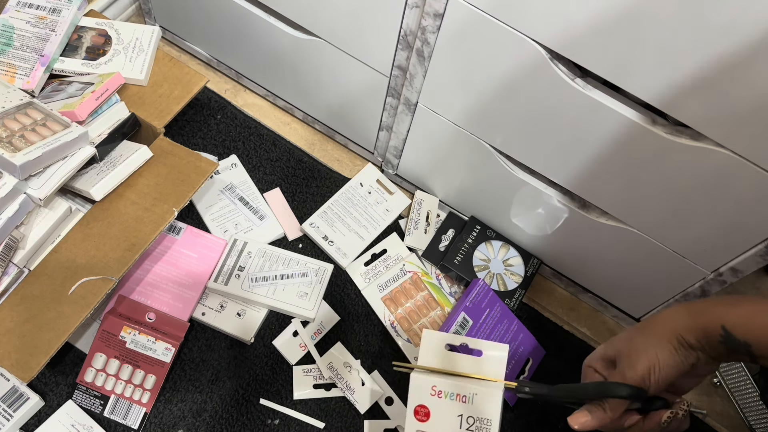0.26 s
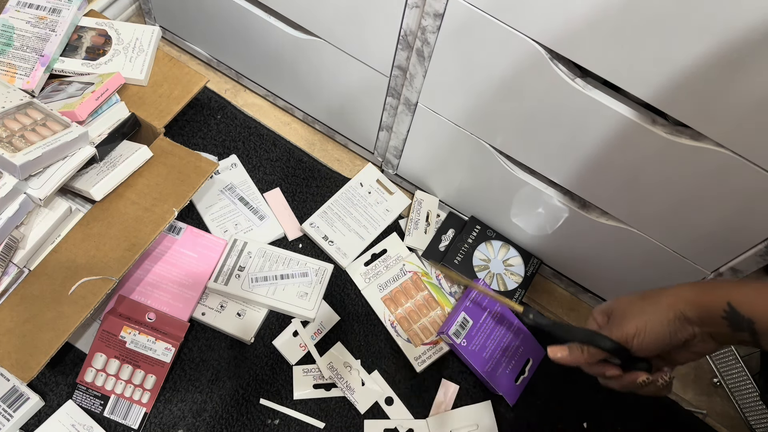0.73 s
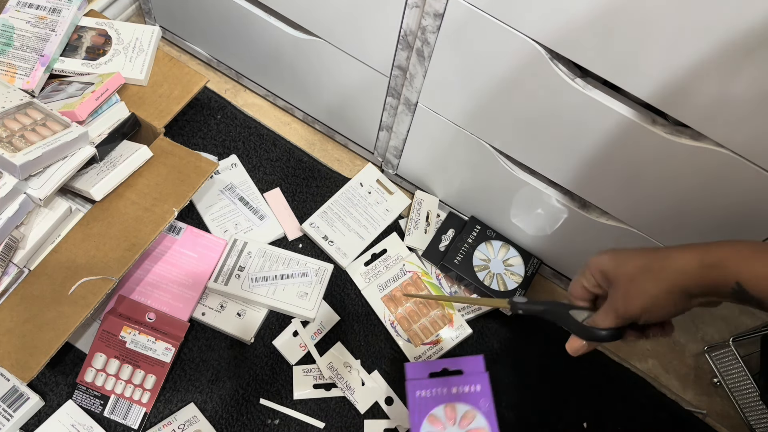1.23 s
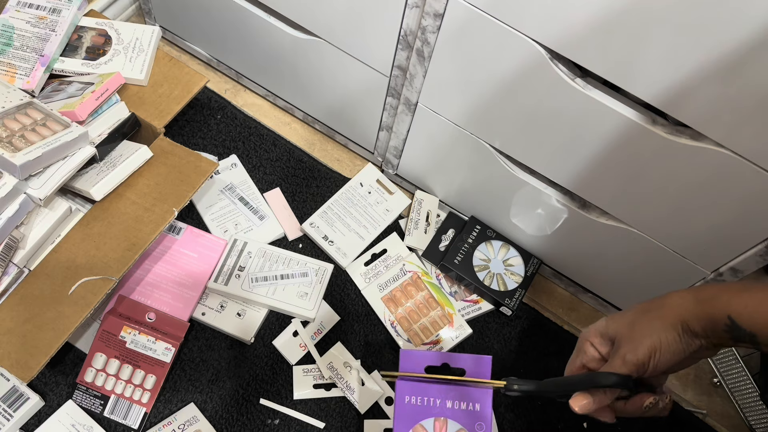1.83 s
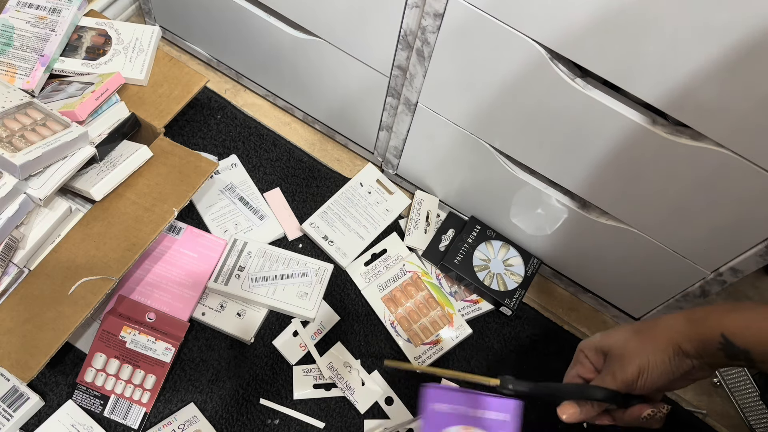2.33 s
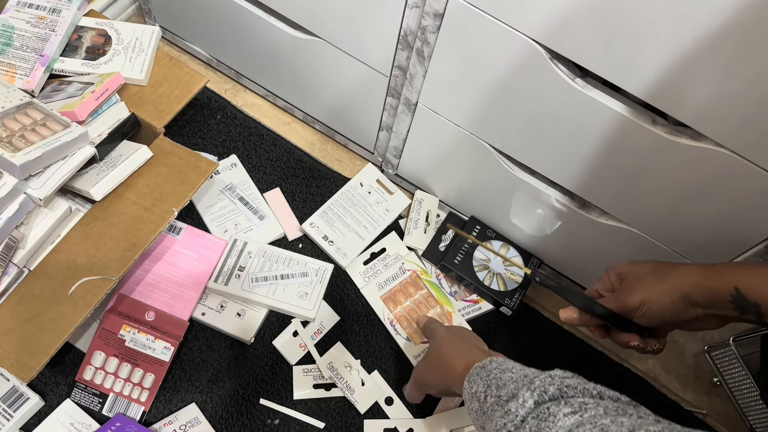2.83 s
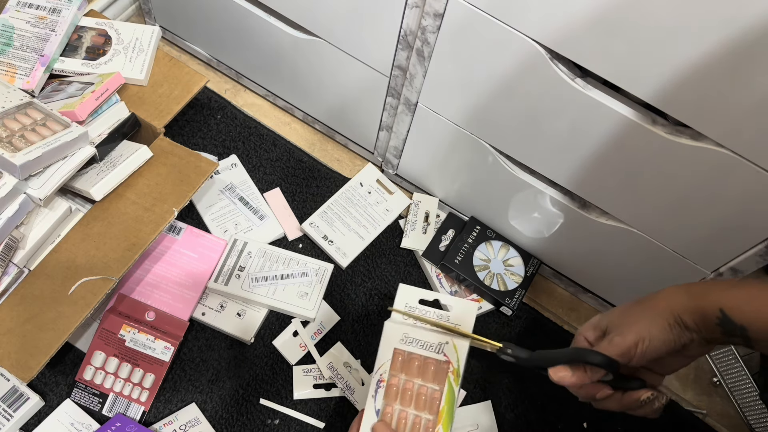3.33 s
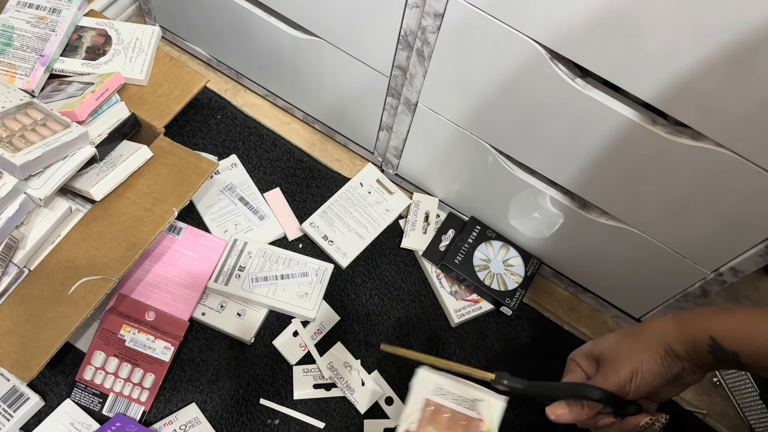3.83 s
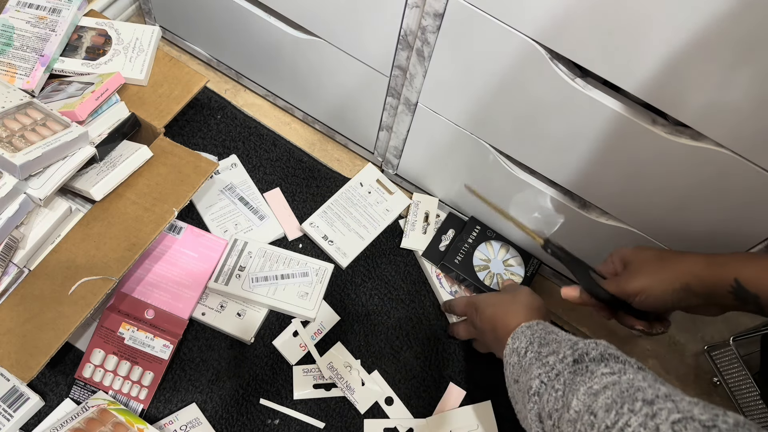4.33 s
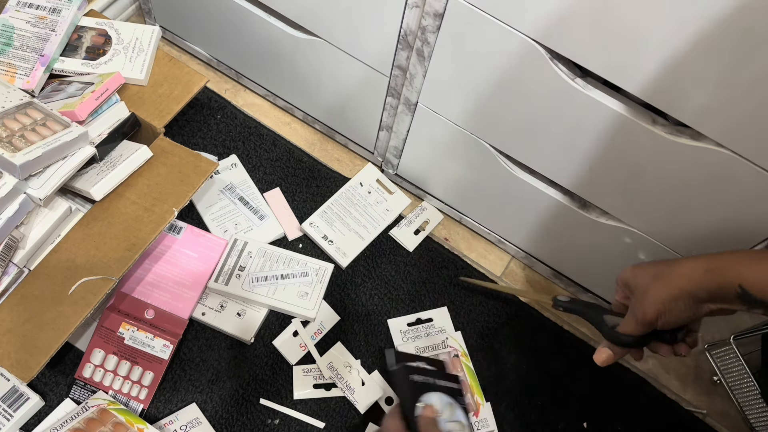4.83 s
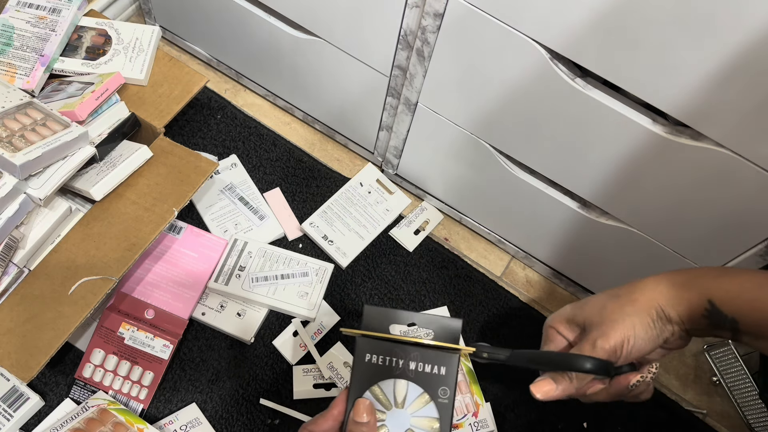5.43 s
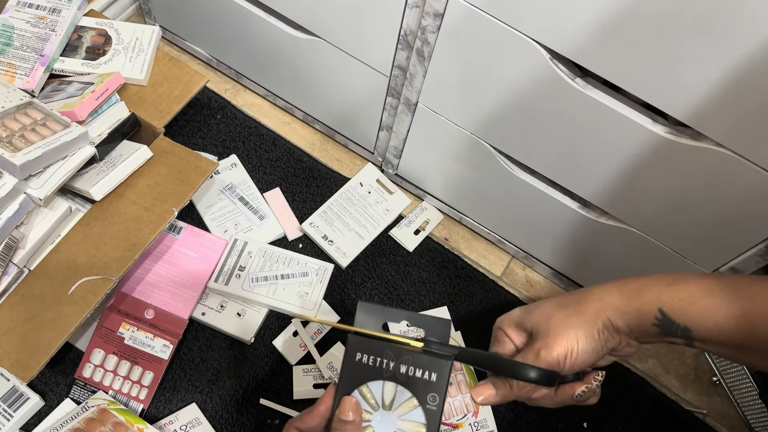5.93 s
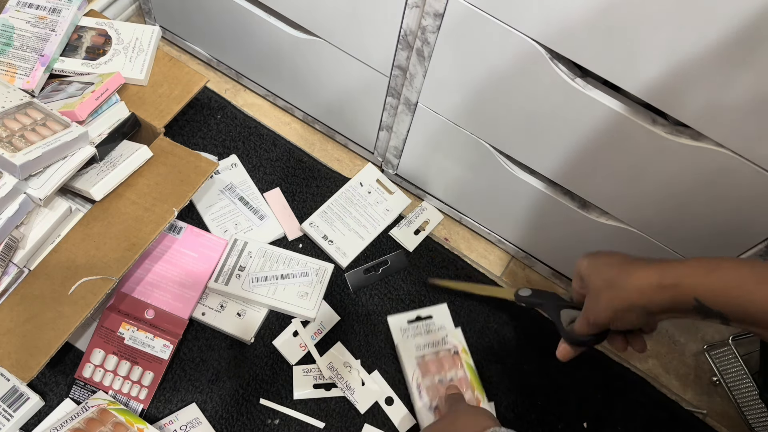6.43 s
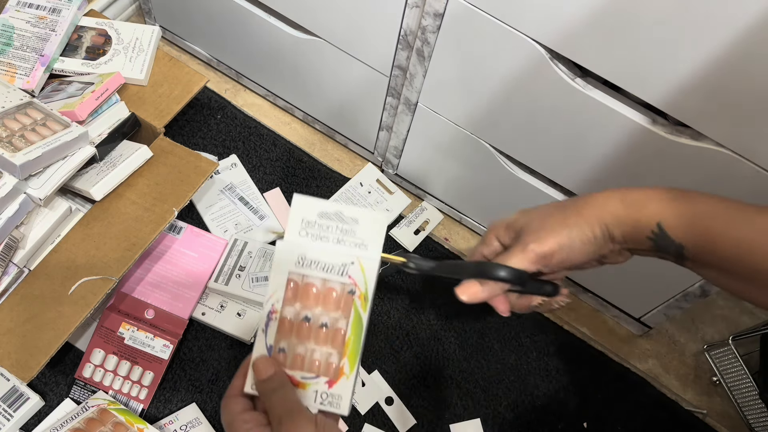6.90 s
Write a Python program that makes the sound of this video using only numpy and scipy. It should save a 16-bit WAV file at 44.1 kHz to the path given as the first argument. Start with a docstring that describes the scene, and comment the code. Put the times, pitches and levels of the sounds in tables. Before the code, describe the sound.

In a small room with a soft floor and a faint hum, thin card packs are picked up, cut with scissors and dropped, one after another. The snips are dry and crackly, close to the microphone, mixed with rustling, short scrapes and taps on hollow boxes. A few sharper slaps and dull bumps stand out along the way, and the handling ends in lighter rubbing and ticks.

```python
"""A small soft-floored room with a faint hum. Close by, scissors snip through thin card packs that are
picked up, turned and dropped on a pile. Every snip, tap and slap is a burst of tiny cracks that rings
the card and its hollow box. In between, fingers and card edges rub and scrape, and packs and hands
bump the floor."""
import sys
import numpy as np
from scipy import signal
from scipy.fft import rfft, irfft
from scipy.io import wavfile
from scipy.ndimage import uniform_filter1d

SR = 44100
rng = np.random.default_rng(int(sys.argv[2]) if len(sys.argv) > 2 else 0)


def log_audio(samples):
    """Write samples as a 16-bit WAV file to the path given in sys.argv[1]."""
    # one column per channel
    frames = np.atleast_2d(samples).T
    # limit to full scale, then quantise
    limited = np.clip(frames, -1, 1)
    pcm = np.round(limited * 32767).astype(np.int16)
    wavfile.write(sys.argv[1], SR, pcm)


N = 315756


def gain_of(db):
    return 10 ** (np.asarray(db) / 20)


def unit_rms(x):
    return x / np.sqrt(np.mean(x ** 2) + 1e-20)


def curve_at(points, hz):
    """Read a curve along a log-frequency axis."""
    point_hz, value = np.transpose(points)
    return np.interp(np.log(hz + 1), np.log(point_hz + 1), value)


def add(mix, start_s, sound):
    part = mix[..., max(round(start_s * SR), 0):][..., :sound.shape[-1]]
    part += sound[..., :part.shape[-1]]


def equalise(x, curve):
    """Minimum-phase EQ of unit energy: colour with no ringing ahead of the attack."""
    hz = abs(np.fft.fftfreq(4096, 1 / SR))
    log_gain = curve_at(curve, hz) * np.log(10) / 20
    taps = np.fft.ifft(np.exp(np.conj(signal.hilbert(log_gain)))).real[:2048]
    return signal.oaconvolve(x, taps[None] / np.linalg.norm(taps), axes=1)[:, :N]


def ring(x, hz, width_hz):
    """Band-pass resonance that keeps the power of white noise."""
    radius = np.exp(-np.pi * np.clip(width_hz, 20, 4000) / SR)
    feedback = [1, -2 * radius * np.cos(2 * np.pi * hz / SR), radius ** 2]
    return signal.lfilter(np.sqrt((1 - radius ** 2) / 2) * np.array([1, 0, -1]), feedback, x)


# Colour of the room tone. Each row: frequency in Hz, relative level in dB.
AIR_EQ = [(24, -44.5), (40, -12.5), (64, -2.5), (158, -3), (198, -10.5), (327, -9.5), (380, -26.5),
          (526, -12), (728, -32), (890, -34), (1330, -21.5), (12600, -26), (15800, -26.5)]
# Width of the room tone. Each row: frequency in Hz, left-right likeness from 0 (wide) to 1 (mono).
AIR_LIKENESS = [(100, 1), (600, 0.25), (2000, 0.13), (8000, .1)]
AIR_DB, HUM_DB, HUM_HZ = -69, -79.5, 125


def room_tone():
    """Room air and microphone hiss, with a wavering mains hum."""
    hz = np.fft.rfftfreq(N, 1 / SR)
    left, other = rfft(rng.standard_normal((2, N)))
    likeness = np.clip(curve_at(AIR_LIKENESS, hz), 0, 1)
    right = likeness * left + np.sqrt(1 - likeness ** 2) * other
    hiss = irfft(np.array([left, right]) * gain_of(curve_at(AIR_EQ, hz)), N)
    hum = ring(rng.standard_normal(N), HUM_HZ, width_hz=25)
    return gain_of(AIR_DB) * unit_rms(hiss) + gain_of(HUM_DB) * hum


# The room's short decay. Each row: frequency in Hz, seconds to fall 60 dB.
ROOM_T60 = [(200, 0.061), (1000, 0.13), (4000, 0.088), (15000, 0.1)]
# Bounce off the pile and drawers. Each row: frequency in Hz, send level in dB.
REFLECTION_EQ = [(200, -63), (1000, -13), (4000, -7.5), (15000, -11.5)]


def reflections(x):
    """Sparse echoes of random sign, different left and right, each band dying at its own speed."""
    taps = np.zeros((2, SR // 3))
    predelay, gap = 40, 20  # samples
    slots = np.arange(predelay, SR // 3 - gap, gap)
    arrivals = slots + rng.integers(0, gap, (2, len(slots)))
    np.put_along_axis(taps, arrivals, rng.choice([-1., 1.], arrivals.shape), 1)
    hz, t, bands = signal.stft(taps, SR, nperseg=128)
    t60 = curve_at(ROOM_T60, hz)[:, None]
    decay = gain_of(curve_at(REFLECTION_EQ, hz)[:, None] - 60 * t / t60)
    unit_energy = np.sqrt(gap * 6 * np.log(10) / (t60 * SR))
    tail = signal.istft(bands * decay * unit_energy, SR, nperseg=128)[1]
    tail[:, :predelay] = 0
    return signal.oaconvolve(x, tail, axes=1)[:, :N]


# Packs and hands bumping the soft floor. Each row: start in seconds, level in dB, pack pitch in Hz.
THUDS = [(0.255, -49, 219), (.341, -53, 245), (0.476, -35.5, 174), (.699, -50, 315), (1.53, -46, 291),
         (1.887, -54, 300), (2.251, -41.5, 124), (2.56, -45, 322), (3.118, -49.5, 135), (3.269, -51, 146),
         (3.77, -38, 184), (4.063, -36, 325), (4.512, -39.5, 353), (5.208, -51, 212), (5.535, -52, 350),
         (5.62, -47, 350), (5.965, -44.5, 129), (6.291, -34.5, 261)]
PACK_T60_S, FLOOR_T60_S, FLOOR_HZ, FLOOR_DB = 0.071, .16, 110, -9


def thuds():
    """A soft push rings the pack for a few cycles, and the floor answers below it."""
    out, t = np.zeros(N), np.arange(SR // 4) / SR
    attack = 1 - np.exp(-t / 0.00043)
    for (start, db, hz), (pack_phase, floor_phase) in zip(THUDS, rng.random((len(THUDS), 2))):
        pack = gain_of(-60 * t / PACK_T60_S) * np.sin(2 * np.pi * (hz * t + pack_phase))
        floor = gain_of(-60 * t / FLOOR_T60_S) * np.sin(2 * np.pi * (FLOOR_HZ * t + floor_phase))
        add(out, start, gain_of(db) * attack * (pack + gain_of(FLOOR_DB) * floor))
    return out


def crackle(count, per_s, spread_db, clump_db, clump_s):
    """Fibres break as tiny clicks of uneven size that come in clumps."""
    clicks = rng.random(count) < per_s / SR
    size = np.minimum(rng.exponential(1, count), 4)
    kick, drift = rng.standard_normal((2, count))
    window = int(clump_s * SR) + 1
    clumps = unit_rms(uniform_filter1d(uniform_filter1d(drift, window), window))
    return unit_rms(clicks * kick * gain_of(spread_db * size + clump_db * clumps))


# Stereo width, as the gain of the side signal. In order: card, box, cut edges, treble.
LAYER_WIDTH = np.array([.4, .2, .5, .45])


def widen(mid, side):
    """Cracks lie all along the card, so left and right differ. Returns (layer, channel, sample)."""
    width = LAYER_WIDTH[:, None, None]
    return np.sqrt(1 - width ** 2) * mid[..., None, :] + width * side[..., None, :] * [[1], [-1]]


def friction(count, **grain):
    """The tiny slips of sliding card, as stereo crackle for each of the four layers."""
    slips = crackle(count, **grain)
    return widen(slips, slips * rng.choice([-1, 1], count))


# The four tone layers of a pack. Each row: frequency in Hz, relative level in dB.
CARD_EQ = [(600, -31.5), (1200, -9), (1800, 4), (2600, 8.5), (3300, -6), (4500, -20)]
BOX_EQ = [(60, -39), (120, -11.5), (250, -7), (500, -4.5), (800, 3.5), (1100, -2.5), (1800, -33.5)]
EDGE_EQ = [(2200, -31), (3200, 2), (4000, 4), (5000, 2.5), (6000, -1.5), (8000, -31)]
TREBLE_EQ = [(3000, -42), (5000, -6.5), (7000, -2), (10000, -4), (12500, -7), (15000, -1.5)]


def pack_body(layers, trims_db):
    """The stiff card, the hollow box, the cut edges and the fine treble each have a colour."""
    curves = CARD_EQ, BOX_EQ, EDGE_EQ, TREBLE_EQ
    return sum(gain_of(db) * equalise(x, curve) for x, db, curve in zip(layers, trims_db, curves))


# Fader moves for the rubbing. Each row: time in seconds, then card, low and treble drive in dB.
RUB_FADERS = [(0.0, -72, -75.5, -62.5), (0.66, -56.5, -77, -53.5), (0.94, -70, -66, -62),
              (1.15, -78, -92, -65), (1.45, -62.5, -67, -57), (1.75, -56, -73.5, -55),
              (2.45, -60, -80, -57.5), (2.65, -73.5, -79, -68), (3.09, -62.5, -76.5, -55),
              (3.39, -94, -65, -71), (3.63, -63, -59.5, -58), (3.95, -58, -82, -50), (4.11, -81, -81, -74),
              (4.35, -81.5, -81, -71), (4.46, -76, -79, -71), (4.63, -55.5, -65, -52),
              (4.81, -63.5, -80, -52), (5.24, -52.5, -64.5, -58), (5.36, -60, -74, -51),
              (5.64, -64, -77, -63), (6.04, -62, -76.5, -55), (6.4, -61.5, -74.5, -58.5),
              (6.96, -69, -74.5, -61), (7.16, -83, -82, -75)]
# The hands rest. Each row: start in seconds, end in seconds.
# Overlapping rests dip further; a row that ends before it starts does nothing.
RESTS = [(.285, 0.32), (.66, 0.79), (.885, .925), (1.02, 1), (1.37, 1.39), (1.7, 1.62), (2.038, 2.13),
         (2.78, 2.9), (3.205, 3.6), (3.29, 3.6), (3.6, 4.1), (3.8, 3.6), (4.855, 5.32), (5.27, 4.6),
         (5.47, 4.95), (5.67, 5.93), (5.89, 5.86)]
# Palms brushing pile and floor. Each row: frequency in Hz, relative level in dB.
PALM_EQ = [(150, -18), (300, -3.5), (500, -2), (700, 3.5), (1000, -20.5), (1500, -36)]
REST_DB, REST_FADE_S = -10, 0.013
PALM_DB, HELD_BOX_DB = 2.5, -7  # trims on the low fader; the hand damps the box


def rubbing():
    """Fingers and card rub in dense slips that follow the hands and duck when they rest."""
    t = np.arange(N) / SR
    rests = sum((t > start) & (t < end) for start, end in RESTS).astype(float)
    duck_db = REST_DB * uniform_filter1d(rests, int(REST_FADE_S * SR))
    times, *faders = np.transpose(RUB_FADERS)
    card_db, low_db, treble_db = (np.interp(t, times, fader) + duck_db for fader in faders)
    edge_db = (card_db + treble_db) / 2 - 1.5
    slips = friction(N, per_s=20000, spread_db=1.0, clump_db=2.5, clump_s=0.006)
    layers = gain_of([card_db, low_db, edge_db, treble_db])[:, None] * slips
    palms = gain_of(PALM_DB) * equalise(layers[1], PALM_EQ)
    return pack_body(layers, trims_db=[0, HELD_BOX_DB, 0, 0]) + palms


# Strokes that sing in one band. Each row: start and end in seconds, start and end pitch in Hz,
# bandwidth in Hz, start and end level in dB.
SCRAPES = [(0.407, 0.442, 3630, 3320, 500, -45, -38), (0.47, 0.503, 1500, 3200, 600, -30, -41),
           (1.045, 1.211, 1980, 2320, 400, -51.5, -44), (1.117, 1.217, 7950, 7350, 1210, -38.5, -42.5),
           (1.417, 1.435, 6000, 6000, 7240, -52, -54), (1.739, 1.765, 4000, 4000, 7000, -41, -47),
           (2.28, 2.413, 2380, 1920, 480, -52, -46.5), (3.461, 3.501, 4300, 3650, 7200, -41, -54.5),
           (3.688, 3.7, 5000, 5000, 7000, -50, -60), (4.448, 4.564, 1550, 1470, 795, -43, -38),
           (4.578, 4.846, 1390, 1240, 780, -45, -59.5), (4.897, 4.92, 6850, 7000, 12200, -41, -57),
           (6.276, 6.328, 2200, 2220, 350, -37, -36), (6.323, 6.46, 2170, 1780, 346, -30.5, -60),
           (6.667, 6.685, 3020, 3530, 4840, -47, -45)]


def scrapes():
    """Slips excite a resonance that slides as the free length of card changes."""
    out = np.zeros((2, N))
    card_slips = friction(N, per_s=13000, spread_db=2.5, clump_db=6.5, clump_s=0.0028)[0]
    for start, end, start_hz, end_hz, width_hz, start_db, end_db in SCRAPES:
        slips = card_slips[:, round(start * SR):round(end * SR)]
        count = slips.shape[1]
        sweep = np.exp(2j * np.pi * np.cumsum(np.linspace(start_hz, end_hz, count)) / SR)
        pole = [1, -np.exp(-np.pi * width_hz / SR)]
        # Shift down, low-pass, shift back: a band-pass that rides the sweep.
        band = (sweep * signal.lfilter([1], np.convolve(pole, pole), slips / sweep)).real
        envelope = gain_of(np.linspace(start_db, end_db, count)) * signal.windows.tukey(count, .25)
        add(out, start, unit_rms(band) * envelope)
    return out


# Snips, taps and slaps. Each row: start in seconds, card drive in dB, card ring in Hz, box ring in Hz,
# box and treble drive in dB over the card, attack in seconds, seconds to fall 60 dB.
HITS = [(0.0266, -36, 2770, 407, -16, -7, 0.003, 0.26), (0.055, -34.5, 2320, 635, -3, -2.5, 0.0086, 0.017),
        (.082, -47, 3050, 700, -7, 0, .002, 0.013), (0.153, -47, 2700, 900, -18, 3, 0.0046, 0.24),
        (0.2125, -38, 2740, 1130, -14, -4.5, 0.0032, 0.15),
        (0.2312, -26, 2650, 1020, -24, -9.5, 0.0072, 0.016), (.2456, -33.5, 1970, 300, -15, 0, .002, 0.027),
        (0.2583, -26.5, 2720, 1030, -13.5, -6.5, 0.0018, .035),
        (0.3319, -36.5, 2900, 1040, -27, -7, 0.0025, 0.13),
        (0.3393, -35.5, 2540, 960, -4, 1.5, 0.0047, 0.035), (0.396, -34, 3440, 440, -27, -7, 0.01, .026),
        (.409, -30, 2540, 970, -28, -2.5, 0.008, .011), (0.4218, -25, 3470, 1000, -14, -8, 0.0019, 0.013),
        (0.4287, -29.5, 3540, 990, -12, -4, .003, 0.018), (0.439, -25, 1270, 1000, -26, -20, .002, 0.023),
        (0.46, -32, 2420, 825, -5, -5, .002, .055), (.472, -19, 2830, 973, -10, 3, 0.0041, .029),
        (.491, -25, 2750, 705, -8.5, -8, 0.0047, 0.023), (0.5208, -14, 2170, 1020, -9.5, -9, 0.0033, 0.031),
        (0.5453, -49.5, 2220, 775, -2, 12.5, 0.0017, 0.077), (.6132, -43.5, 2620, 830, -26, 1, .002, 0.045),
        (.6916, -30, 2230, 780, -9, -3, 0.00042, 0.12), (0.7053, -22, 2700, 965, -2.5, 0, 0.0016, 0.031),
        (0.7626, -43, 2230, 980, -3, -30, 0.0014, 0.044), (.7852, -33.5, 1800, 960, -4, -9.5, 0.0088, 0.1),
        (0.816, -44, 2720, 766, -3, -4, 0.0049, 0.12), (.8573, -47.5, 2400, 596, -3, 0, 0.011, 0.058),
        (0.9245, -46, 2550, 790, -7, -6, 0.0022, 0.029), (0.941, -35.5, 1800, 1060, -16, -18, 0.0037, 0.12),
        (.972, -17, 1940, 1210, -8.5, -9.5, 0.0034, 0.019), (.99, -35, 2040, 1070, -13, -11, 0.0033, 0.041),
        (1.061, -39.5, 1840, 1130, -11.5, -1, .009, 0.33), (1.1343, -30, 1960, 1210, -14, 4, 0.012, 0.081),
        (1.169, -45, 2310, 1100, -25, 8, 0.0023, 0.16), (1.233, -50, 2470, 570, -37, 4, 0.0071, .16),
        (1.2973, -52, 2160, 517, -26, -0.5, 0.0063, 0.15),
        (1.4452, -42, 2030, 330, -14.5, 7, 0.0017, 0.092), (1.5125, -39, 2350, 340, -7, 6, 0.0044, 0.066),
        (1.526, -34.5, 2620, 413, -10, 4, 0.0016, 0.082),
        (1.5378, -28.5, 2220, 393, -1.5, 1, 0.0028, 0.033), (1.548, -25.5, 2200, 620, -18, -1, .004, 0.029),
        (1.5708, -32, 2010, 570, -3, 0.5, 0.0031, 0.065),
        (1.6187, -33.5, 2000, 665, -12, -8.5, 0.003, 0.017), (1.6528, -43, 2230, 530, -17, -14, .003, 0.1),
        (1.6656, -24, 2640, 566, -20, -6.5, 0.00081, 0.046),
        (1.7534, -34, 2680, 656, -19, -2, 0.0097, 0.058), (1.7734, -32.5, 2000, 680, -16, 2.5, .003, 0.042),
        (1.7984, -29, 1850, 694, -5.5, -4.5, 0.0019, 0.02),
        (1.827, -33, 2400, 1020, -8, -12, 0.0042, 0.011), (1.853, -38.5, 1840, 1010, -8, -7, 0.0048, 0.048),
        (1.8762, -32, 2410, 1020, -16, -3.5, .0035, 0.17),
        (1.8853, -25.5, 1940, 567, -13, -3, 0.0022, 0.065),
        (1.9392, -34, 2070, 884, -4.5, -0.5, 0.0017, 0.13), (1.972, -35, 1920, 990, -13, -4, 0.0019, 0.046),
        (2.003, -39, 1800, 1000, 0.5, -1.5, 0.0063, 0.027), (2.067, -39.5, 2030, 1010, -18, 0, .003, 0.26),
        (2.142, -33.5, 2120, 655, -2, -2, 0.00079, 0.063), (2.178, -28, 1730, 553, -12, -7, 0.0017, 0.02),
        (2.221, -41, 2540, 610, -26, -11, 0.0049, .02),
        (2.2465, -22.5, 1960, 960, -11.5, 4.5, 0.0035, 0.084),
        (2.3076, -44, 3500, 1150, -14, -1.5, .002, 0.19), (2.3677, -42, 2230, 1150, -35, 7, 0.0018, 0.11),
        (2.3983, -35, 1990, 1180, -37, -6, .002, 0.027), (2.4248, -37, 2720, 870, -21, -2, .0015, 0.011),
        (2.4345, -17.5, 2740, 950, -22.5, -9, 0.0029, 0.018),
        (2.4977, -27, 2000, 990, -42, -38, 0.0016, 0.026),
        (2.5154, -51.5, 1720, 570, -15, 4.5, 0.0035, 0.13),
        (2.5488, -21.5, 1790, 543, -21, -9.5, 0.0048, 0.037),
        (2.56, -19.5, 2050, 504, -9, 0.5, 0.0038, 0.061), (2.587, -35.5, 1840, 550, -12, -1, .002, 0.13),
        (2.611, -33, 2030, 500, -3.5, 0, 0.0021, 0.11), (2.7703, -49, 3500, 1020, -13, 2, 0.0041, .02),
        (2.8257, -34, 1480, 1180, -30, -7.5, 0.0014, 0.019),
        (2.868, -39.5, 1390, 1200, -33, -11, 0.0029, 0.045),
        (2.885, -42.5, 2900, 1160, -19, -6, 0.0018, 0.094),
        (2.9242, -40.5, 2780, 350, -18.5, -4.5, 0.017, 0.06),
        (2.9817, -47, 2200, 300, -21, -1, .002, 0.086), (3.084, -38, 3560, 750, -13, -3.5, .0013, .032),
        (3.1, -49.5, 2620, 480, -12, -4, 0.0021, 0.23), (3.153, -42.5, 2600, 956, -5, 1.5, 0.0031, 0.024),
        (3.181, -38.5, 2540, 1080, -8, -7, .0024, .035),
        (3.2662, -36.5, 2480, 965, -1.5, -0.5, 0.0021, 0.046),
        (3.3343, -43, 3620, 1180, -13, 0, 0.016, .04), (3.355, -36, 3400, 1000, -11.5, -3.5, 0.002, 0.1),
        (3.371, -34, 2400, 1120, -12.5, -7, 0.0013, 0.047), (3.384, -39, 3670, 400, -11, -7, 0.0033, .02),
        (3.4257, -43.5, 3060, 580, -24, -9, 0.0029, .016),
        (3.495, -40.5, 2760, 300, -20, 1.5, 0.0018, 0.083),
        (3.5332, -38, 3000, 1050, -7, -1.5, 0.0039, 0.11), (3.552, -38, 2940, 404, -17, -2, 0.0039, 0.054),
        (3.5618, -30.5, 3600, 780, -18.5, -8, 0.003, 0.015),
        (3.6445, -39.5, 3000, 1150, -19, -3, .003, 0.12), (3.704, -37, 3500, 1090, -4.5, 0, 0.008, 0.034),
        (3.721, -37.5, 2840, 1320, -2.5, -8, 0.00086, 0.063),
        (3.7424, -39.5, 2460, 1110, -6, 7.5, .001, 0.024), (3.7678, -28, 2400, 743, -4, -0.5, 0.01, 0.021),
        (3.827, -53.5, 2220, 730, 0, 5, .002, 0.033), (3.874, -47.5, 2240, 760, -29, -2, .004, .02),
        (3.9032, -28, 2940, 980, -17, -4.5, 0.0009, 0.026), (3.9183, -43, 2030, 1220, -19, 6.5, .002, .04),
        (3.93, -30.5, 2310, 880, -38, -13, .0015, 0.024),
        (3.9377, -42.5, 3510, 1023, -30, 5, 0.0018, 0.038),
        (3.9732, -50.5, 2480, 950, -29, 8, 0.0027, 0.045),
        (4.0314, -65.5, 2700, 320, -10, 26, 0.0044, 0.043),
        (4.0476, -24, 1950, 980, -12, -3.5, 0.0049, .05), (4.066, -13, 1730, 974, -6, -6.5, 0.0012, 0.023),
        (4.0837, -19.5, 1940, 492, -3.5, -19, 0.0024, 0.0098),
        (4.0889, -35, 1810, 522, 1, 0, 0.00085, 0.11), (4.297, -56.5, 1890, 1160, -21.5, 2, 0.015, 0.17),
        (4.434, -28.5, 1200, 700, 5.5, -20, 0.0064, 0.032),
        (4.4503, -36, 3070, 730, -24, -5.5, 0.0046, 0.12), (4.4656, -40, 2360, 576, 2.5, -5.5, .014, 0.15),
        (4.5037, -22, 2300, 1090, -15, -5.5, 0.0012, 0.024),
        (4.5132, -32, 2220, 1220, -3, -4, 0.0028, 0.13), (4.549, -41, 1480, 330, -9, -17, .0014, 0.026),
        (4.5751, -27, 1290, 1150, -17, -37, 0.0062, 0.0089), (4.587, -32, 2010, 1190, -9, -9, .0016, 0.028),
        (4.61, -38, 2070, 1050, -13, 2.5, 0.0037, 0.038), (4.6464, -50, 1380, 1090, -18, 4, .003, 0.32),
        (4.6824, -32, 1300, 1190, -27, -25, 0.0066, 0.066), (4.736, -43, 2120, 1060, -1, -4, 0.01, 0.12),
        (4.784, -39.5, 1870, 1220, -26, -1.5, 0.013, .071), (4.916, -52, 2410, 567, -17, 8.5, 0.013, 0.13),
        (4.9696, -45, 2360, 810, -13, 0, 0.0051, .079), (5.0052, -33.5, 2560, 1020, -24, 3.5, 0.003, 0.029),
        (5.0212, -47, 2580, 960, -8, 8, .0016, 0.15), (5.0425, -54, 3450, 580, -3, 16, .002, 0.019),
        (5.075, -45.5, 2600, 303, -4.5, 5, .003, 0.079), (5.108, -52.5, 3840, 870, -13, 7, 0.01, 0.091),
        (5.1423, -49.5, 2450, 970, -13, 10, 0.0017, 0.021),
        (5.1565, -47.5, 2430, 990, 1.5, 13.5, 0.01, .01), (5.1996, -40, 2720, 700, -14.5, 5, 0.016, 0.033),
        (5.222, -46, 2440, 590, -9, 7, 0.00088, .1), (5.2525, -48, 2540, 560, -8, -3, .001, .044),
        (5.3245, -44, 2320, 400, -6.5, 7, 0.0092, 0.19), (5.372, -54, 3760, 590, -20, 6, .003, .02),
        (5.4, -46, 2590, 640, 0.5, 7.5, .004, 0.098), (5.418, -43.5, 2500, 950, -8, 4.5, 0.0013, 0.14),
        (5.535, -28, 2550, 826, -6.5, -2, 0.0055, .08), (5.599, -42, 2650, 802, -11, 0, .004, 0.03),
        (5.6078, -33.5, 2580, 537, -12, -9.5, 0.0025, 0.068),
        (5.6266, -40, 2660, 553, 3, -1, 0.0035, 0.035), (5.641, -42, 2700, 560, -3, 1, .0014, 0.037),
        (5.7168, -46, 2570, 690, -23, -18, .0016, 0.024),
        (5.7367, -37, 2550, 670, -34, -7.5, 0.0015, 0.051), (5.75, -31, 2420, 800, -2.5, 0, 0.0047, 0.041),
        (5.7797, -31, 2800, 594, -17, -6, 0.0015, 0.015), (5.8236, -37.5, 1716, 910, -3, 0, .0013, 0.12),
        (5.8568, -43, 2440, 656, -6, -2, 0.00089, 0.027),
        (5.9607, -23.5, 2260, 780, -16.5, 2, 0.0011, 0.05),
        (6.0317, -42.5, 3800, 750, -14, 0, .0014, 0.041),
        (6.045, -19.5, 3270, 984, -16.5, -0.5, 0.004, 0.013),
        (6.081, -46, 1920, 586, -21, -3, 0.012, 0.079), (6.1357, -44.5, 2100, 300, -19, -12, 0.0063, 0.027),
        (6.179, -59, 1960, 600, -20, 8, .002, 0.042), (6.2194, -47, 2640, 453, -18, 7, 0.0061, 0.12),
        (6.2783, -35, 2040, 770, -11, 4.5, 0.0022, 0.23),
        (6.2947, -16.5, 2170, 793, -10, -1.5, 0.0026, 0.04),
        (6.3127, -24, 2330, 940, -4, 3.5, 0.0012, 0.013), (6.3406, -26.5, 2150, 950, -17, -5, 0.0041, 0.06),
        (6.3741, -47.5, 2240, 670, -8.5, -1, 0.003, 0.3), (6.392, -57, 1900, 800, -26, -11, .0012, .12),
        (6.476, -34.5, 2200, 1020, -13, -5.5, .0023, 0.12),
        (6.5232, -42.5, 2210, 1070, -6, -11, 0.0024, 0.036),
        (6.588, -50, 2770, 650, -37, -2.5, 0.0059, 0.35), (6.6785, -46, 3150, 1310, -15, 4.5, 0.002, 0.21),
        (6.6993, -52, 3540, 1200, -26, 5, 0.0069, 0.053), (6.722, -40.5, 2670, 590, -33, 0, .0023, 0.027),
        (6.807, -53.5, 1920, 1000, -3, -23, 0.0016, .04), (6.842, -54, 1990, 990, -2, -14, 0.0023, .04),
        (6.998, -61.5, 1720, 410, -16, 11, .005, 0.4), (7.1115, -42, 2070, 320, -7, -6, 0.0014, 0.039)]
# Where the hands work. Each row: time in seconds, pan as left over right in dB.
HAND_PAN = [(0, 0.5), (2.45, 0.5), (2.56, 3), (2.7, 0), (3.85, 0), (4.07, 2.5), (4.4, -0.5), (4.8, 0),
            (7.16, 1)]
PAN_SCATTER_DB = 1.2
EDGE_FOLLOW, EDGE_DB = 0.68, -3.5  # the cut edges partly follow the treble drive
DRAG_DB, DRAG_S, DRAG_RING_DB = -22.5, 0.025, -6.5  # the card slides on; sliding fingers damp the rings


def snips_and_slaps():
    """Each burst of cracks rises, dies fast and drags on, driving card, box, cut edges and treble."""
    cracks = np.array([crackle(N + SR, per_s=14000, spread_db=2.5, clump_db=4.0, clump_s=0.001)
                       for layer in range(4)])
    cracks = widen(cracks, cracks[::-1])
    slips = friction(N + SR, per_s=16000, spread_db=5.5, clump_db=6.5, clump_s=0.0011)
    rings, layers = np.zeros((2, N)), np.zeros((4, 2, N))
    for start, db, card_hz, box_hz, box_db, treble_db, rise, t60 in HITS:
        flap_octaves, scatter = rng.uniform(0, 1.5), rng.uniform(-1, 1)
        t = np.arange(round((rise + max(t60, 2 * DRAG_S) + .03) * SR)) / SR
        span = slice(round(start * SR), round(start * SR) + len(t))
        envelope = np.minimum(t / rise, 1) ** 0.94 * gain_of(-60 * np.maximum(t - rise, 0) / t60)
        burst = envelope * cracks[..., span]
        burst *= np.linalg.norm(envelope) / np.linalg.norm(burst, axis=2, keepdims=True)  # even punch
        drag_envelope = np.minimum(t / 0.0075, 1) / (1 + (t / DRAG_S) ** 6.2)
        drag = gain_of(DRAG_DB) * drag_envelope * slips[..., span]
        edge_db = EDGE_FOLLOW * treble_db + EDGE_DB
        sends = gain_of(db + np.array([0, box_db, edge_db, treble_db]))[:, None, None]
        drive = sends * (burst + drag)
        damped_drive = sends * (burst + gain_of(DRAG_RING_DB) * drag)
        card = gain_of(-7.5) * ring(damped_drive[0], card_hz, width_hz=280)
        box = gain_of(-3) * ring(damped_drive[1], box_hz, width_hz=100)
        # Each bite frees a small flap of its own size; neighbouring bends of the card ring broadly.
        flap = gain_of(-9) * ring(drive[3], 3400 * 2 ** flap_octaves, width_hz=520)
        bends = gain_of(-24) * ring(ring(drive[0], card_hz, width_hz=790), card_hz, width_hz=790)
        pan_db = np.interp(start, *np.transpose(HAND_PAN)) + PAN_SCATTER_DB * scatter
        pan = gain_of([[pan_db / 2], [-pan_db / 2]])
        add(rings, start, pan * (card + box + flap + bends))
        add(layers, start, pan * drive)
    return rings + pack_body(layers, trims_db=[-9.5, -9.5, -1.5, 1.5])


# Phase between the microphone ports. Each row: frequency in Hz, left lead in radians.
LEFT_LEAD = [(500, 0.), (4500, 0.), (7500, 1.), (12000, 1.1), (15000, 2.5)]
# Balance between the ports. Each row: frequency in Hz, left over right in dB.
LEFT_TILT = [(300, -1), (3000, 0.5), (10000, 2)]


def microphone_ports(x):
    """The two ports sit apart: the treble reaches the left one first and stronger."""
    hz = np.fft.rfftfreq(N, 1 / SR)
    half_shift = np.exp(.5j * curve_at(LEFT_LEAD, hz)) * gain_of(curve_at(LEFT_TILT, hz) / 2)
    return irfft(rfft(x) * np.array([half_shift, 1 / half_shift]), N)


def scene():
    """The close handwork and its reflections, over the room tone."""
    handwork = snips_and_slaps() + rubbing() + scrapes() + thuds()
    return microphone_ports(handwork + reflections(handwork)) + room_tone()


LOW_CUT_HZ, HIGH_CUT_HZ = 95, 15950


def record(dry):
    """The microphone drops the deep bass and the very top."""
    thinned = signal.sosfilt(signal.butter(4, LOW_CUT_HZ, "high", fs=SR, output="sos"), dry)
    high_cut = signal.firwin(301, HIGH_CUT_HZ, window=("kaiser", 9), fs=SR)
    return signal.oaconvolve(thinned, high_cut[None], "same")


dry = scene()
out = record(dry)
log_audio(out)
```